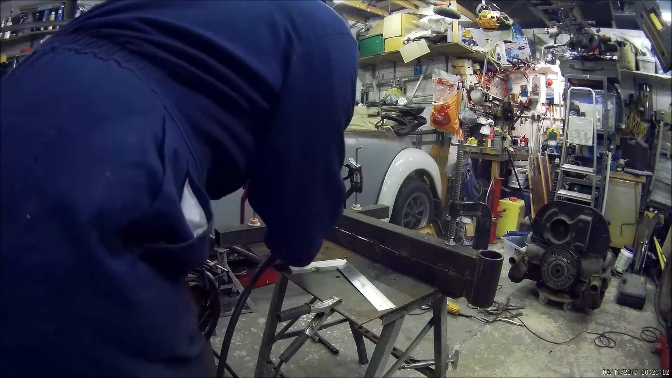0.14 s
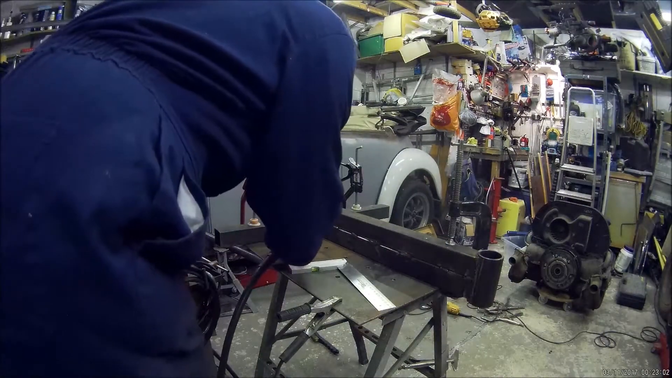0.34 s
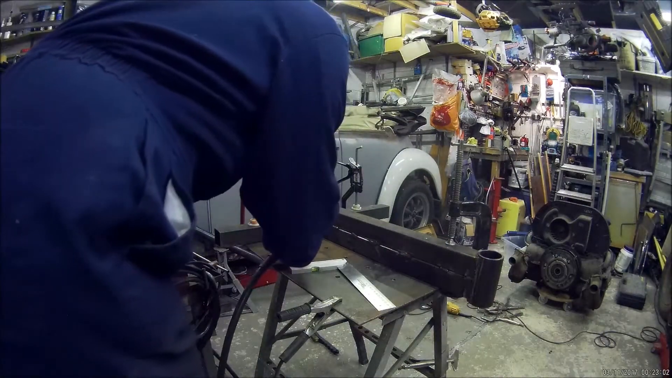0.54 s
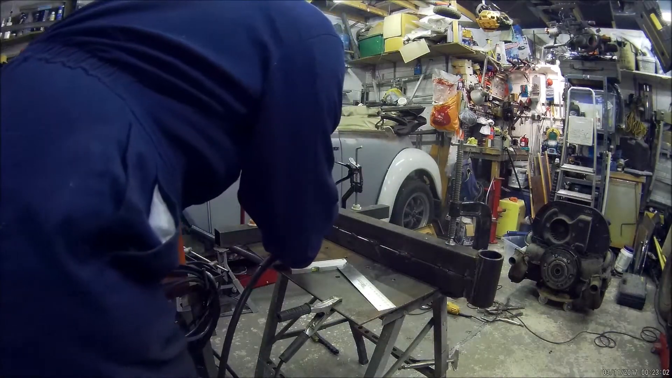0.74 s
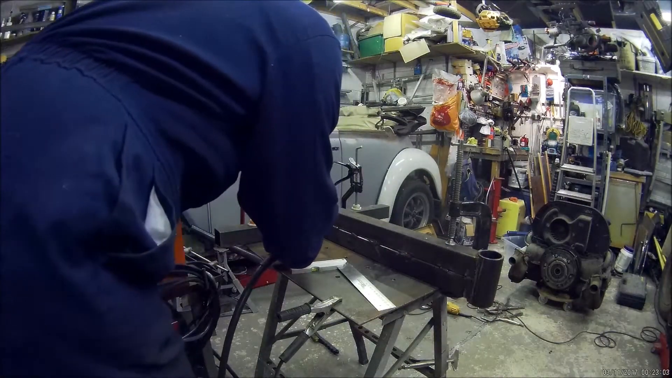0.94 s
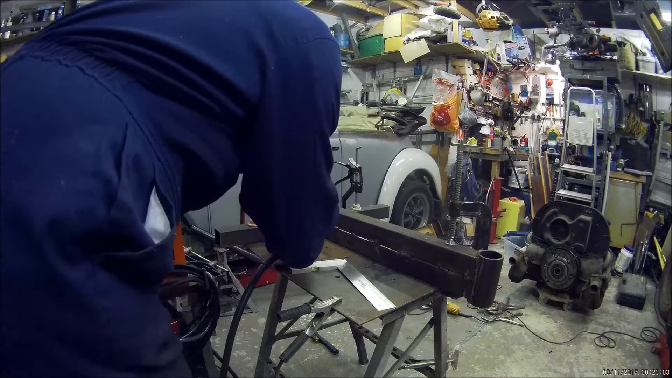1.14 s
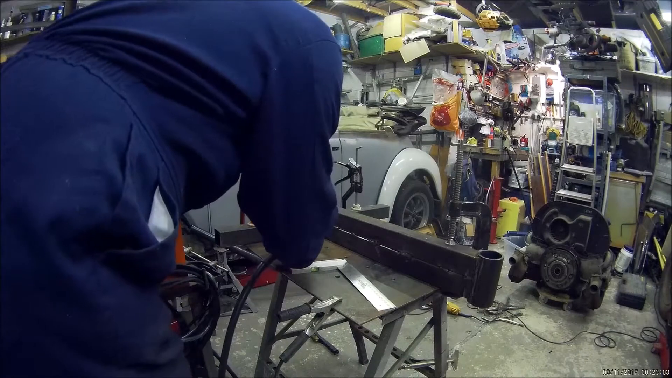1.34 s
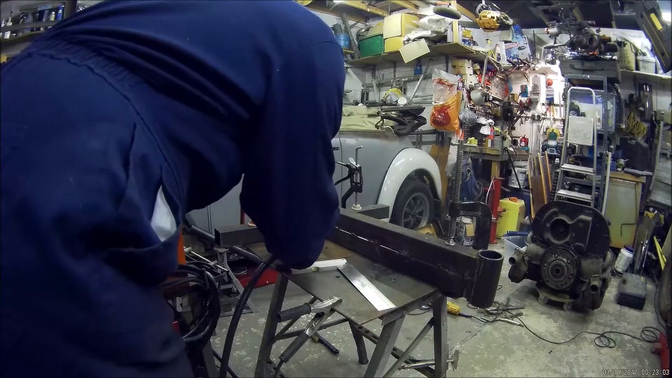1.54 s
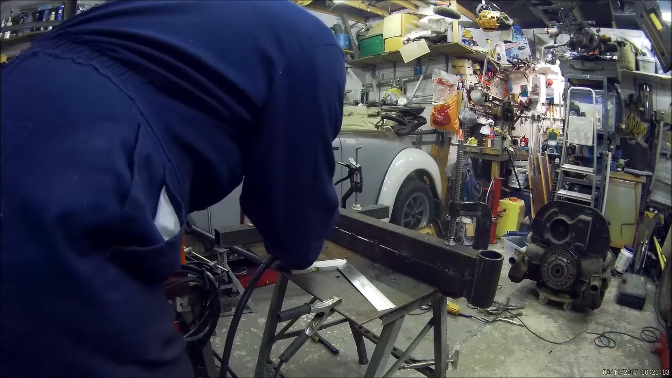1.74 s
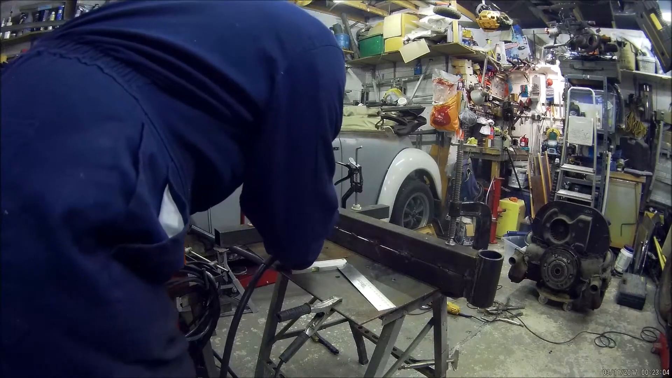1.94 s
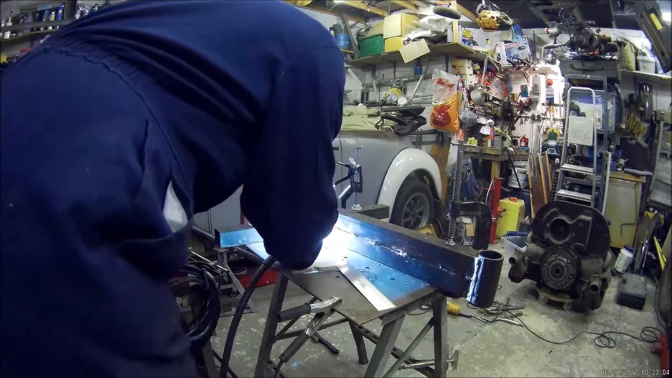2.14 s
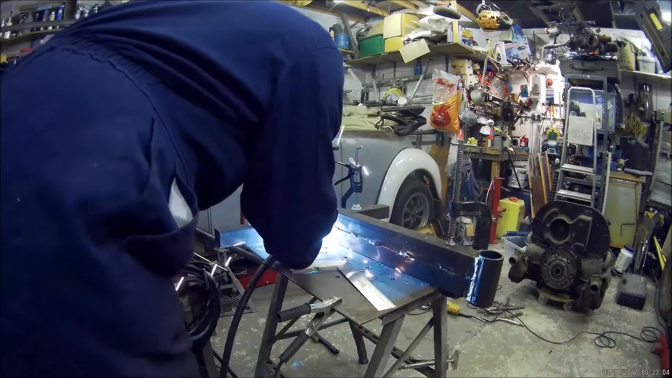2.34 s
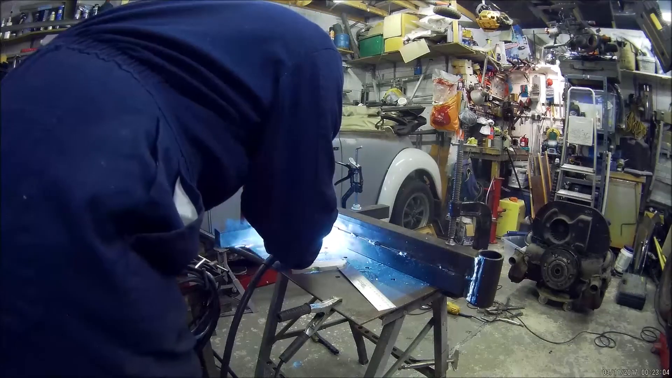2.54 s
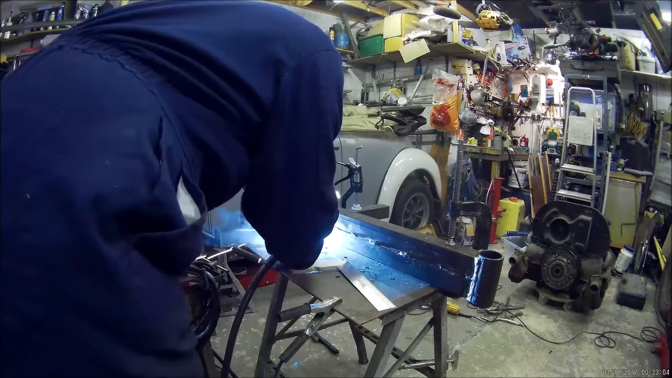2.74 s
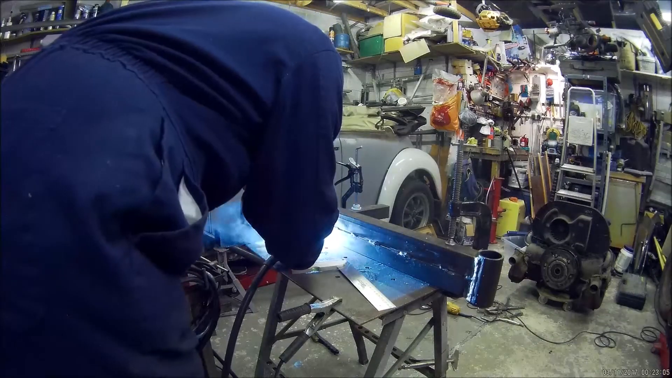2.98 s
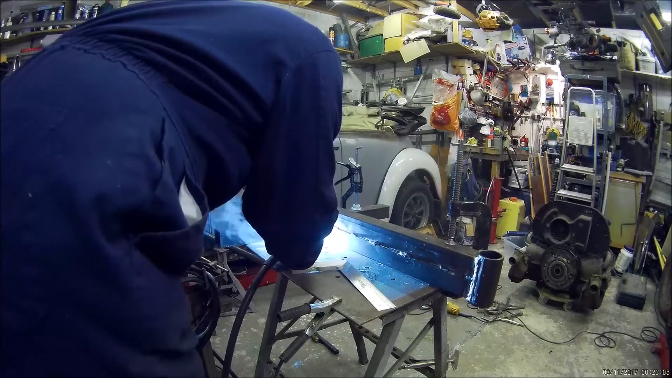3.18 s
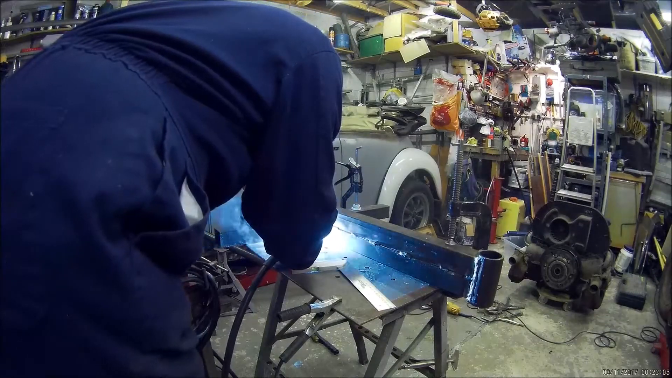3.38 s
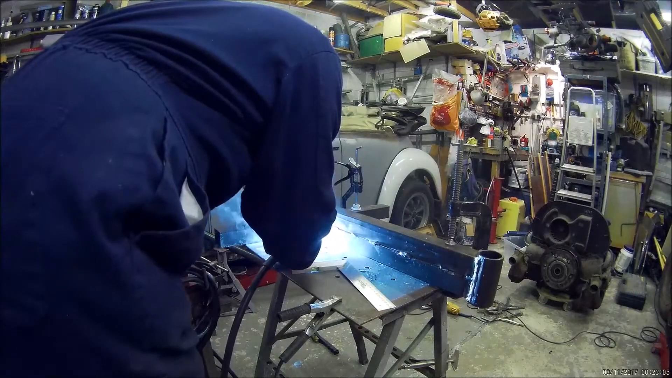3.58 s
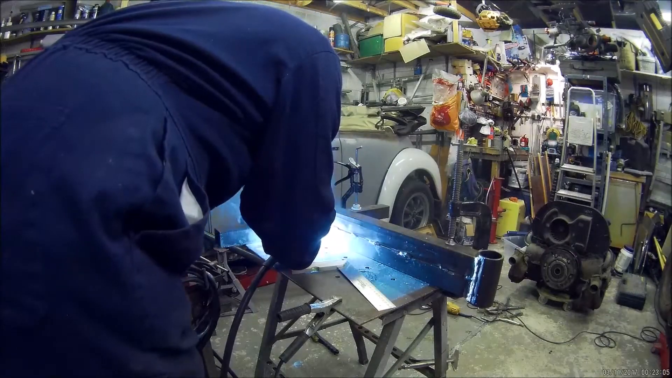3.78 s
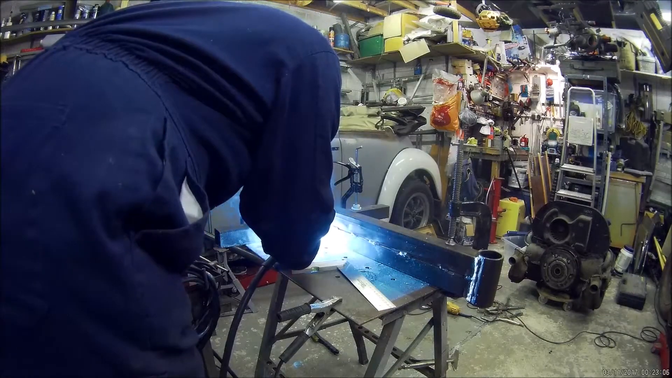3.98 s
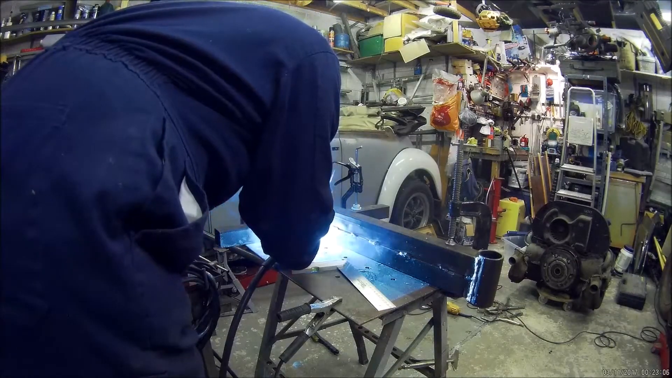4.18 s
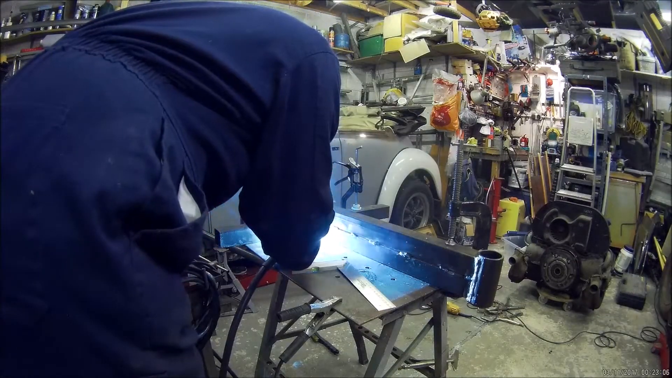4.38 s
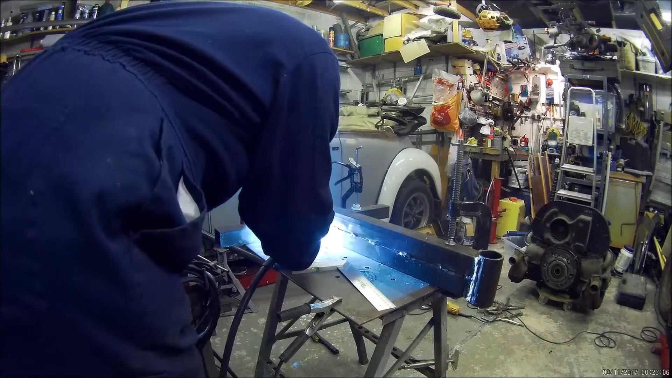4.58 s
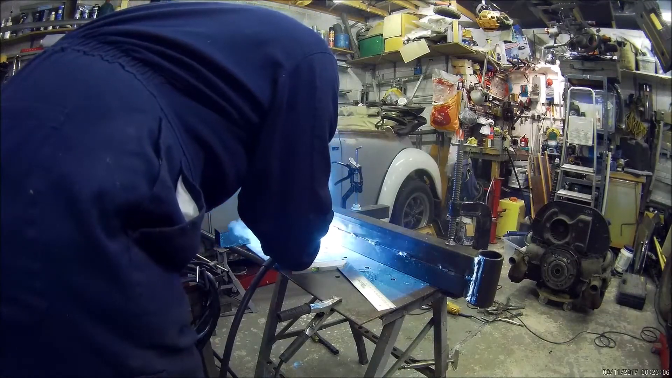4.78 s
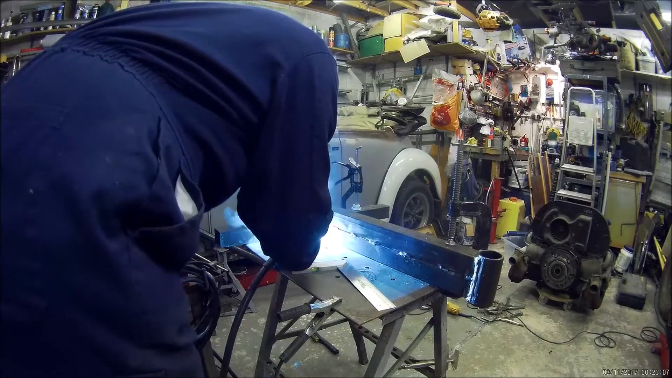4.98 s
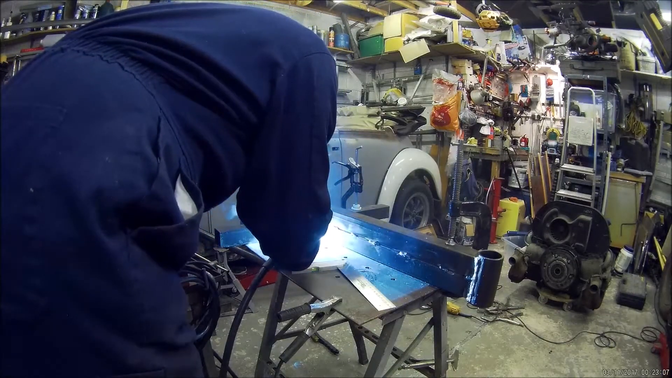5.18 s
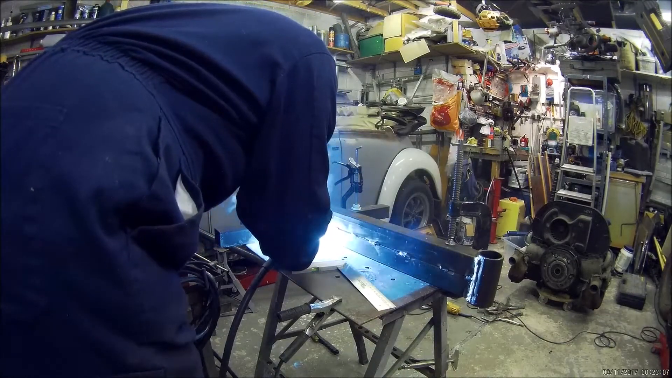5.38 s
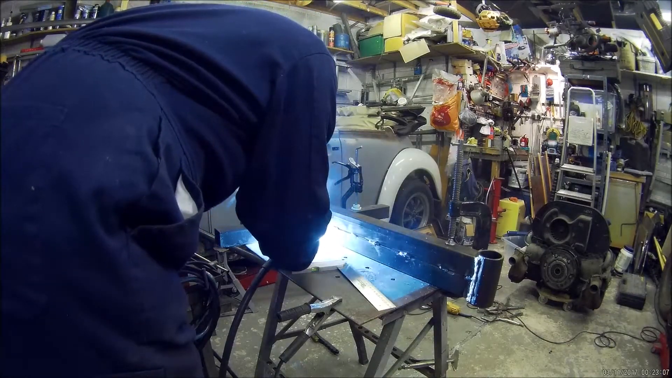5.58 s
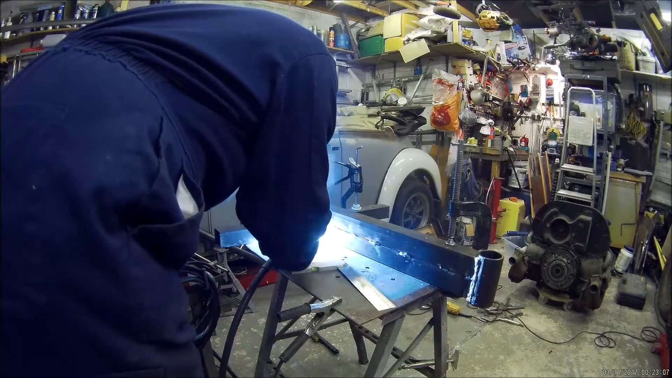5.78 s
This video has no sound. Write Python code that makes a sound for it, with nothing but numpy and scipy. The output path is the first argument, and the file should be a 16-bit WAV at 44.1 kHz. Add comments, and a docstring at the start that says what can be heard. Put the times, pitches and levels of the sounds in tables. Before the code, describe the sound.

For the first 1.7 seconds it is very quiet: a welding machine's low hum and soft fan, cloth rustling mostly in the first 0.4 seconds and briefly near 1.1, barely audible thin squeaks around 0.4 and 1.2, and light taps at 0.1 and, more clearly, 1.5. At 1.7 shielding gas spurts, then settles into a hollow, fluttering hiss, joined by a faint low drone. A small spark ticks at 2.06 and the arc catches at 2.08 with tiny whistles and a violent cluster of pops. From there to the end near 6 seconds it fries continuously, rough with mains pulsing, under sharp, uneven snaps often repeating a hundredth of a second apart. Droplets sputter after them; short dull rasps appear, strongest near 2.4, 3.0 and 4.4. The close microphone flattens and thumps on the hardest pops, amid brief bench reflections, faint steel ringing and a short garage tail.

```python
"""Arc welding on a steel beam in a cluttered garage, with a small microphone close by.
The welder's hum tones and fan noise run throughout, under shaped-noise cloth rustle, light taps and squeaks.
The torch then hisses with filtered noise and a narrow drone joins; a spark and brief whistles mark the strike.
The arc fries as dense ticks and noise in step with the rectified mains, and pops as short shaped pulses.
Pops bounce off bench and beam, ring in the room and overload the microphone; short dull rasps lie among them."""
import sys
import numpy as np
from scipy import signal
from scipy.fft import rfft, irfft, next_fast_len
from scipy.io import wavfile
from scipy.ndimage import uniform_filter1d

SR = 44100
rng = np.random.default_rng(int(sys.argv[2]) if len(sys.argv) > 2 else 0)


def materialize(psi):
    """Save the field psi as 16-bit PCM at rate SR to the path in sys.argv[1].

    A 1-D psi becomes a single channel; in a 2-D psi each row is a channel.
    """
    bounded = np.clip(np.atleast_2d(psi).T, -1, 1)
    quanta = np.round(bounded * 32767).astype(np.int16)
    wavfile.write(sys.argv[1], SR, quanta)


N = 256662

# hum tones of the idling welder: (frequency [Hz], rms level [dB])
HUM_TONES = [(199.2, -68), (236.9, -72), (355.3, -75), (602.9, -70), (699.8, -80), (904.4, -84)]
# colour of the welder's fan: (frequency [Hz], relative density [dB per Hz])
FAN_COLOUR = [(15, -31), (25, -10), (86, -15), (202, -6.5), (309, -13.5), (354, -7.5), (475, -16.5),
              (604, -11), (749, -19), (978, -15), (1120, -26), (1460, -20.5), (5010, -48), (15000, -43)]
# hard surfaces near the arc: (delay [ms], gain [signed ratio])
BENCH_ECHOES = [(1.587, .14), (3.039, -.28), (3.696, -.18), (4.376, -.14), (4.943, -.25), (5.442, -.22),
                (10.02, -.07), (11.47, .09)]
# overalls and cable shifting: (time [s], length [s], level [dB])
CLOTH_SHIFTS = [(-.25, 0.62, -64), (1.087, 0.14, -69)]
# colour of the rustling cloth: (frequency [Hz], relative density [dB per Hz])
CLOTH_COLOUR = [(350, -1.5), (600, -2), (642, -20), (765, -3), (1330, -6), (2300, -7.5), (3360, -6.5),
                (4700, -12.5), (7450, -22.5), (15000, -34)]
# light taps of the torch and its cable: (time [s], level [dB])
TORCH_TAPS = [(0.1, -63), (1.504, -58)]
# colour of a tap: (frequency [Hz], relative density [dB per Hz])
TAP_COLOUR = [(800, -25), (1520, 4), (2000, -3), (2500, 1), (2900, 2), (4000, -8), (6000, -24), (12000, -45)]
# faint squeaks as things shift: (time [s], length [s], starting pitch [Hz], level [dB])
SQUEAK_EVENTS = [(0.328, 0.195, 3080, -80), (1.079, .41, 3240, -76)]
# colour of gas leaving the nozzle: (frequency [Hz], relative density [dB per Hz])
NOZZLE_COLOUR = [(300, -25), (800, -31), (1250, -15), (1650, -13), (2080, -7), (2600, -11.5), (3200, -12),
                 (3700, -16.5), (4400, -14), (5200, -25), (7000, -19.5), (8300, -35), (9900, -40),
                 (11200, -25), (12500, -49), (15500, -40)]
# the wire shorts into the pool and bursts, often again on the next half waves:
# (time [s], peak level [dB], dullness shelf [dB], sharpness shelf [dB])
POP_EVENTS = [(2.0867, -4.5, -5, 5), (2.0982, 1.5, 11, 8), (2.174, 11, -2, 9), (2.1926, 0, -3, 12),
              (2.1933, 3, 5, 1), (2.195, 1.5, 0, 11), (2.2642, 2, 8.5, 16), (2.2736, -4, 7.5, 0),
              (2.2857, -15, -2, -3), (2.2868, -12, 0, -8), (2.302, -2.5, 1, 4), (2.3714, 3, 2, 3),
              (2.3807, -3, -1, 1), (2.3918, -1.5, 6, 9.5), (2.3946, -8, 3, 6), (2.3957, -1, 2, 10),
              (2.4044, -9, 7, 1.0), (2.4133, -8, 1, -18), (2.4731, 0.5, 5.5, 14), (2.4855, -1, 4, 11),
              (2.4945, -3, 3, 13.5), (2.5044, -4, -5.5, 2), (2.513, -3, -2, -2.0), (2.5639, 1.5, 1.5, 7),
              (2.5741, -6, 1, -5), (2.5839, -8.5, -1, -5.5), (2.6031, -5.5, 7, -2), (2.6117, -9, -2, -6),
              (2.6444, -0.5, -2.0, 5), (2.6534, -11, 6, 3), (2.6653, -3, 4.0, 4), (2.6841, -0.5, 0, 5),
              (2.6933, -3, -1, 10), (2.7035, -5, 4.5, 3), (2.7622, 4.5, -7.5, 6.5), (2.8222, 4, -8, 6.5),
              (2.9533, 4.5, -4, 9.5), (2.9724, 0.5, -0.5, 9.5), (2.9824, -12, 0, 5), (2.9832, 2.5, -3, 2),
              (2.9926, -10, -6, -15), (3.0615, 6, -3, 10), (3.102, -2, 3.5, 4), (3.1466, -6, 5.5, 4),
              (3.1512, -14, 3, 0), (3.1613, -3.5, -5, 3), (3.1798, -11.5, 10, 2.5), (3.202, 4.0, 5, 9.5),
              (3.2116, -19, 1.5, 0.0), (3.2333, 7, 2, 12), (3.2447, -23, -10, -5.5), (3.2616, -2.5, 0, -1),
              (3.274, -12.5, -6, -15), (3.3231, -2.5, 3, 11), (3.3603, -9, -1, 3), (3.3721, -4, 2, 7),
              (3.383, 4.5, -5, 6), (3.3935, -4.5, 1, 4), (3.4112, -8.5, 6, 4), (3.4428, 0, 4, 6),
              (3.4518, -2, -3, 5), (3.4632, -5, 11, 7), (3.4726, -3, -0.5, 8), (3.4825, -6, 1, -2),
              (3.54, -9, 0, -2), (3.5728, -1, -1.5, 9.5), (3.6014, -0.5, -4.5, 3.5), (3.613, -18.0, 3, 2.0),
              (3.6348, -17, 1, -3.5), (3.6523, 3.5, -10, 3), (3.6625, -1, 8, 7), (3.7109, 0, -0.5, 9.5),
              (3.7203, -4.5, 4.5, 3), (3.7625, 9.5, -4, 10), (3.8126, 2, 1, 8.5), (3.8222, -3, -2, 5),
              (3.8403, -10, -3, -10), (3.8926, 6.5, -3, 6.5), (3.9029, 1, -1.5, 9), (3.911, -3, 1, 8),
              (3.9225, -10, 1, -2.5), (3.944, -7.5, 3, -5), (3.959, -14, -9, -3), (3.9726, 3.5, -7, 8.5),
              (3.982, -3.5, 1, 7), (3.9927, -6, 5, 2.0), (4.0018, -8, -1, 5), (4.0109, -12, -7, 0),
              (4.0419, -7, 8.5, 5), (4.0608, -10, 7, 2), (4.0938, -1.5, 0.5, 4), (4.1000, -9.5, 0, 2),
              (4.1116, -6.5, 10, 15), (4.1202, -10, 5, -2), (4.1520, -10, -2, 5), (4.1546, -3.5, 0, -3),
              (4.1610, -7.5, 0, -2), (4.1917, 0.5, -3.5, 7.5), (4.204, -21, 1, 0.0), (4.2304, -9, -1, 0),
              (4.2432, -16, 1, -9.0), (4.2615, 6, -4, 0), (4.271, 1, 1, 14), (4.282, -2, 10, 13),
              (4.2923, -3, 4, -5), (4.351, 0.5, -0.5, 9.5), (4.3602, -8, 4, -2), (4.3724, 0.5, -1.5, -4),
              (4.392, 0, -1, 3), (4.4319, -0.5, -2, 9.5), (4.4415, -3, 8, 10), (4.5014, 7, -11, 4.5),
              (4.5121, -6, 6, 8), (4.5212, -9, 5, 2.0), (4.5325, -4.5, -3, 4.0), (4.5421, -7.5, -1, -2.5),
              (4.6, 0, -6.5, 6.5), (4.6315, -4.5, -1, 1), (4.663, -0.5, 0.5, 9.5), (4.6703, -10, 6.5, 1.0),
              (4.6801, -4, 0.5, -5), (4.6919, 2.5, -6, 7), (4.7016, -3.5, 0.5, -2), (4.7207, -7.5, -1, -18),
              (4.731, -7.5, -7, -15), (4.8317, 6.5, -4, 7.5), (4.8416, -2, 9, 8), (4.8515, -7.5, 0.0, -24),
              (4.903, -18, 4, -5), (4.9223, 1.5, -0.5, -5), (4.9415, -1, -2.5, 10), (4.95, -11, -5, 4),
              (4.9615, -3.5, 4, 2), (4.971, -4.5, -2.5, 5.5), (5.0225, -18, 2.0, -2.5),
              (5.0435, -18, 4, -5), (5.0615, 7.5, -2, 10), (5.0721, -10.5, 4, -6), (5.082, -8, 3, 1),
              (5.1393, -1, 0, 8), (5.1514, -0.5, 6.5, 6), (5.181, -4.5, 6, -3), (5.213, -2, 3, 6),
              (5.2308, -0.5, 2, 3), (5.2622, 1, -5.5, 7), (5.271, -3, 3, -9), (5.301, -20, -4, -1.5),
              (5.3714, 9.5, -4.5, 6), (5.4297, 0.5, -0.5, 9), (5.4515, -17, 7, -9), (5.4726, -16, 5, -12),
              (5.4911, -12, -5.0, 1), (5.5126, -15, 7, -2.5), (5.5328, -8.5, 3, 12), (5.5444, 0.5, 5.5, 8),
              (5.5731, -3.5, 12, -2), (5.5737, -4, -7, 3), (5.5921, -14.5, 14, -1), (5.5923, 4, -4.5, 9),
              (5.6318, 5, -1.5, 14), (5.6743, -13.5, -8, 2), (5.7111, 3, 3.5, 8), (5.7309, 8.0, -3, 9.5)]
# spectrum of a burst's pressure pulse: (frequency [Hz], relative level [dB])
SNAP_SPECTRUM = [(30, -16), (300, -18.5), (550, -8), (820, -3.5), (1200, 1.5), (1900, 2), (2450, -1.5),
                 (3200, 4), (4500, 2), (5600, -7.5), (7800, -16.5), (11500, -13), (13500, -30),
                 (16000, -36.5)]
# ringing modes of the beam and bench: (frequency [Hz], relative level [dB], 60 dB decay [s])
STEEL_MODES = [(1187, -6, .15), (1272, -5, .15), (1480, -4, .15), (1724, -2, .14), (1948, -2, .15),
               (2860, -4, .13), (3145, -1, .1), (3360, -3, .1), (3757, -2, .1), (3940, -3, .15),
               (4151, -2, .15), (4543, 1, .15), (4741, -2, .15), (6062, -8, .15)]
# decay of the room: (frequency [Hz], 60 dB decay [s])
GARAGE_DECAY = [(150, 0.22), (1000, 0.43), (4000, 0.38), (12000, 0.19)]
# colour of the room's answer: (frequency [Hz], relative level [dB])
WALL_COLOUR = [(100, -3), (500, 12.5), (1500, 2), (4000, 0.5), (5800, 10.5), (7500, 8), (12000, 4)]
# the arc whistles briefly as it catches: (time [s], length [s], pitch [Hz], level [dB])
WHISTLE_EVENTS = [(2.071, 0.02, 1270, -41), (2.113, 0.062, 1075, -32.5), (2.143, .03, 2160, -40)]
# colour of the frying arc: (frequency [Hz], relative density [dB per Hz])
FRY_COLOUR = [(30, -14), (100, -20), (190, -28), (340, -16), (500, -19), (680, -4), (810, 4.5), (1000, -2),
              (1250, 0.5), (1650, 9), (1900, 4.5), (2400, -6), (2820, 4), (3000, -8), (3400, 5),
              (4550, -7.5), (5500, -1), (6050, -3.5), (6800, -14), (9000, -13.5), (11800, -11),
              (15000, -13)]
# colour of the boiling pool: (frequency [Hz], relative density [dB per Hz])
FIZZ_COLOUR = [(2500, -40), (5500, 0), (7500, -4), (11800, 0), (15000, -6)]
# short dull rasps: (time [s], level [dB])
RASP_EVENTS = [(2.104, -35), (2.128, -39), (2.409, -26), (2.986, -23), (3.267, -29.5), (4.377, -25.5),
               (4.719, -36), (4.845, -31), (5.165, -27), (5.273, -32), (5.587, -37)]
# colour of a rasp: (frequency [Hz], relative density [dB per Hz])
RASP_COLOUR = [(250, -43), (700, -2.0), (1600, -3.5), (2300, -9.5), (3600, 2.0), (4800, -6.0),
               (7000, -20), (12000, -60)]
# treble response of the microphone: (frequency [Hz], gain [dB])
MIC_TREBLE = [(12500, 0), (13500, -3), (15900, -3), (16200, -22), (16800, -32)]

STIR_DB = -73.5  # the cloth is never quite still
SQUEAK_RISE = 0.078  # the pitch climbs by this share in mid-movement
VALVE_S, VALVE_OPEN_S, GAS_DB = 1.68, 0.043, -46  # shielding gas: valve time, opening time, steady hiss
SPURT_DB, SPURT_S = 5, 0.054  # pressure stored in the hose escapes first: boost, decay time
JET_HZ, JET_WIDTH_HZ, JET_DB = 2030, 130, -54.5  # the gas excites a resonance of the nozzle
# a low drone under the arc, likely the wire feed: start, rise time, first level, growth
FEED_S, FEED_RISE_S, FEED_DB, FEED_GROWS_DB_PER_S = 1.88, 0.24, -61.5, 1.14
SPARK_S, SPARK_DB = 2.0621, -21  # the wire first touches the steel: time, peak
ARC_S, ARC_DB = 2.08, -40.5  # the arc catches and fries from here on: time, reference level
RIPPLE_HZ, CREST_S = 100, .0025  # half waves of the mains; the current peaks this far into each
# small stray pops: chance per half wave, peak, scatter, sharpness
SPIT_CHANCE, SPIT_DB, SPIT_SPREAD_DB, SPIT_SHARP_DB = 0.22, -21.5, 1.5, 4.5
WHISTLE_SAG_PER_S = 0.31  # share of its pitch lost in a second
SPATTER_DB, SPATTER_S = -28, .006  # droplet ticks: base level against the pop, mean delay
TOP_HZ = 16800  # nothing passes the microphone above this


def amp(db):
    """Decibels to gain."""
    return 10 ** (np.asarray(db) / 20)


def unit(x):
    """Scale to rms 1."""
    return x / np.sqrt(np.mean(x ** 2) + 1e-20)


def along(points, hz):
    """Read (Hz, value) points on a log frequency axis."""
    f, v = np.transpose(points)
    return np.interp(np.log(hz + 1), np.log(f + 1), v)


def filtered(x, response):
    """Apply a response of frequency to x."""
    m = next_fast_len(N + SR // 2)
    return irfft(rfft(x, m) * response(np.fft.rfftfreq(m, 1 / SR)), m)[:N]


def noise(spectrum):
    """Coloured noise of rms 1."""
    return unit(filtered(rng.standard_normal(N), lambda hz: amp(along(spectrum, hz))))


def resonant_noise(centre_hz, width_hz):
    """Noise of rms 1 through a narrow resonance."""
    return unit(filtered(rng.standard_normal(N), lambda hz: 1 / (1 + ((hz - centre_hz) / width_hz) ** 2)))


def pulse(colour_db, size=1024):
    """The causal pulse of peak 1 that has a given spectrum."""
    # folding the cepstrum forward gives the minimum-phase pulse
    cepstrum = irfft(np.log(amp(colour_db(np.fft.rfftfreq(size, 1 / SR)))))
    cepstrum[1:size // 2] *= 2
    cepstrum[size // 2 + 1:] = 0
    p = irfft(np.exp(rfft(cepstrum)))
    return p / np.abs(p).max()


def add(track, s, sound):
    """Mix a sound into a track at time s."""
    part = track[max(round(s * SR), 0):][:len(sound)]
    part += sound[:len(part)]


def since(s):
    """Seconds elapsed since time s, zero before it."""
    return np.maximum(np.arange(N) / SR - s, 0)


def onset(s, attack):
    """A gain that rises from 0 to 1 and holds."""
    return np.clip(since(s) / attack, 0, 1)


def arch(s, length):
    """A gain that swells to 1 and falls back."""
    return np.sin(np.pi * onset(s, length))


def waver(size=100):
    """Smooth random motion of rms 1, alike over about size samples."""
    return unit(uniform_filter1d(rng.standard_normal(N), size=size))


def glide(pitch):
    """A sine of rms 1 that follows a moving pitch in Hz."""
    return np.sqrt(2) * np.sin(2 * np.pi * np.cumsum(pitch) / SR)


def welder(fan_db=-64.5, hum_db=0):
    """The power source hums in steady tones and its fan runs throughout."""
    t = np.arange(N) / SR
    hum = np.zeros(N)
    for hz, db in HUM_TONES:
        hum += amp(db + hum_db) * np.sqrt(2) * np.sin(2 * np.pi * (hz * t + rng.random()))
    return hum + amp(fan_db) * noise(FAN_COLOUR)


def bench(x, shadow_hz=2000, scatter_hz=8000, echo_db=0):
    """Small hard surfaces near the arc throw back the middle band: the bass passes them, the top scatters."""
    def response(hz):
        copies = sum(gain * np.exp(-2j * np.pi * hz * ms / 1000) for ms, gain in BENCH_ECHOES)
        band = hz ** 2 / (hz ** 2 + shadow_hz ** 2) / (1 + (hz / scatter_hz) ** 4)
        return 1 + amp(echo_db) * copies * band
    return filtered(x, response)


def handling(tap_t60=.035, tail_db=-9, tail_t60=.2):
    """Stiff cloth rustles unevenly; the torch is set against the work with light taps."""
    grain = amp(1.6 * waver(size=200))
    motion = amp(STIR_DB) + sum(amp(db) * arch(s, length) for s, length, db in CLOTH_SHIFTS)
    rustle = motion * unit(bench(grain * noise(CLOTH_COLOUR)))
    taps, t = np.zeros(N), np.arange(SR // 4) / SR
    for s, db in TORCH_TAPS:
        contact = amp(db - 60 * t / tap_t60)
        tail = amp(db + tail_db - 60 * t / tail_t60)
        add(taps, s, contact + tail)
    return rustle + taps * noise(TAP_COLOUR)


def squeaks(waver_hz=210):
    """Thin, fuzzy tones that rise and fall with the speed of a movement."""
    out = np.zeros(N)
    for s, length, hz, db in SQUEAK_EVENTS:
        speed = arch(s, length)
        pitch = hz * (1 + SQUEAK_RISE * speed) + waver_hz * waver(size=45)
        level = amp(db + 2 * waver(size=600)) * np.sqrt(np.abs(speed))
        out += level * glide(pitch)
    return out


def gas(flutter_db=0.7):
    """Shielding gas spurts from the nozzle as the valve opens, then settles to a fluttering, hollow hiss."""
    spurt_db = SPURT_DB * np.exp(-since(VALVE_S + VALVE_OPEN_S) / SPURT_S)
    hiss = amp(GAS_DB) * unit(bench(noise(NOZZLE_COLOUR)))
    hollow = amp(JET_DB) * resonant_noise(JET_HZ, JET_WIDTH_HZ)
    pressure = amp(spurt_db + flutter_db * waver(size=300))
    return onset(VALVE_S, VALVE_OPEN_S) * pressure * (hiss + hollow)


def wire_feed(centre_hz=345, width_hz=30):
    """A rough, narrow drone that grows along the weld."""
    level = amp(FEED_DB + FEED_GROWS_DB_PER_S * since(FEED_S))
    return onset(FEED_S, FEED_RISE_S) * level * resonant_noise(centre_hz, width_hz)


def bursts():
    """List the first spark, the pops, and stray spits at crests of the current, in the columns of POP_EVENTS."""
    crests = np.arange(np.ceil(ARC_S * RIPPLE_HZ), N / SR * RIPPLE_HZ) / RIPPLE_HZ + CREST_S
    spits = []
    for s in crests:
        if rng.random() < SPIT_CHANCE:
            spits.append((s, SPIT_DB + SPIT_SPREAD_DB * rng.standard_normal(), 0, SPIT_SHARP_DB))
    return [(SPARK_S, SPARK_DB, 0, 0)] + list(POP_EVENTS) + spits


def pops(gain_db=0, turn_hz=2400, sharp_hz=6500, splinter_db=-16, touch_db=-22, vary_db=2.0, count=2):
    """Each bridge of metal bursts in one pulse, with a few splinters just after; wide bursts sound duller."""
    out = np.zeros(N)
    for s, db, dull_db, sharp_db in bursts():
        own_colour = np.c_[np.geomspace(300, 16000, num=14), vary_db * rng.standard_normal(14)]

        def colour(hz):
            bass = 1 / (1 + (hz / turn_hz) ** 4)
            treble = hz ** 4 / (hz ** 4 + sharp_hz ** 4) / (1 + (hz / 13200) ** 16)
            return along(SNAP_SPECTRUM, hz) + along(own_colour, hz) + dull_db * bass + sharp_db * treble

        snap = amp(db + gain_db) * pulse(colour)
        add(out, s, -snap)
        for lag in rng.uniform(.0003, .0025, size=count):
            add(out, s + lag, amp(splinter_db) * rng.standard_normal() * snap)
        # the drop touches the pool with a small tick just before it bursts
        lead = rng.uniform(.0004, .003)
        add(out, s - lead, amp(touch_db + 2 * rng.standard_normal()) * snap)
    return out


def seam_share(k, count):
    """How near the torch is to the k-th of count places along the seam."""
    place = (count - 1) * onset(ARC_S, N / SR - ARC_S)
    return np.sqrt(np.clip(1 - np.abs(place - k), 0, 1))


def beam(x, ring_db=-24.5, count=3):
    """The steel rings faintly under the arc; each mode answers differently as the torch moves along it."""
    t, out = np.arange(SR // 2) / SR, np.zeros(N)
    for k in range(count):
        ring = np.zeros(len(t))
        for hz, db, t60 in STEEL_MODES:
            scatter_db, turn = rng.standard_normal(2)
            ring += amp(db + scatter_db - 60 * t / t60) * np.sin(2 * np.pi * (hz * t + turn))
        out += signal.fftconvolve(x * seam_share(k, count), ring / np.linalg.norm(ring))[:N]
    return amp(ring_db) * out


def garage(x, wet_db=-16.5, count=5):
    """A short diffuse tail from shelves and walls; it shifts as the torch travels along the seam."""
    out = np.zeros(N)
    for k in range(count):
        # noise that builds over some 5 ms, then decays at its own rate in each band
        hz, t, z = signal.stft(rng.standard_normal(SR // 2), SR, nperseg=256)
        build = 1 - np.exp(-t / .005)
        decay = amp(along(WALL_COLOUR, hz)[:, None] - 60 * t / along(GARAGE_DECAY, hz)[:, None])
        tail = signal.istft(z * build * decay, SR, nperseg=256)[1]
        out += signal.fftconvolve(x * seam_share(k, count), tail / np.linalg.norm(tail))[:N]
    return amp(wet_db) * out


def whistle(waver_hz=30):
    """Short, slightly unsteady falling tones as the arc catches."""
    out = np.zeros(N)
    for s, length, hz, db in WHISTLE_EVENTS:
        pitch = hz * (1 - WHISTLE_SAG_PER_S * since(s)) + waver_hz * waver()
        out += amp(db) * arch(s, length) * glide(pitch)
    return out


def snap_at(hits):
    """Turn each impulse of a track into a small snap of the common burst spectrum."""
    return signal.fftconvolve(hits, -pulse(lambda hz: along(SNAP_SPECTRUM, hz)))[:N]


def frying(ticks_db=-4.0, hiss_db=-2, ripple=0.3, surge_db=1.0, fizz_db=-17, fizz_surge_db=3):
    """The arc: dense tiny ticks on a hiss, swelling with each half wave; the pool's fizz surges and fades."""
    per_second, spread_db = 1500, 5
    current = 1 + np.clip(ripple, 0, 1) * np.cos(2 * np.pi * RIPPLE_HZ * (np.arange(N) / SR - CREST_S))
    sizes = amp(spread_db * np.minimum(rng.exponential(size=N), 4))
    hits = (rng.random(N) < current * per_second / SR) * sizes
    ticks = unit(snap_at(hits - hits.mean()))
    hiss = current * noise(FRY_COLOUR)
    surge = waver(size=2000)
    body = amp(surge_db * surge) * (amp(ticks_db) * ticks + amp(hiss_db) * hiss)
    fizz = amp(fizz_db + fizz_surge_db * surge) * current * noise(FIZZ_COLOUR)
    return onset(ARC_S, 1 / RIPPLE_HZ) * amp(ARC_DB) * (body + fizz)


def spatter(spread_db=4.0, count=5):
    """Droplets thrown by each pop tick after it at random, fraying its tail."""
    hits = np.zeros(N)
    for s, db, _, _ in POP_EVENTS:
        delays, sizes = rng.exponential(size=(2, count))
        for lag, size in zip(delays, np.minimum(sizes, 3)):
            add(hits, s + SPATTER_S * lag, amp([min(db, 0) + SPATTER_DB + spread_db * size]))
    return snap_at(hits)


def rasps(gain_db=0, life=0.025):
    """Short dull bursts of noise with a fast swell and a rounded end."""
    swell, u = np.zeros(N), np.arange(SR // 10) / SR / life
    for s, db in RASP_EVENTS:
        add(swell, s, amp(db + gain_db) * np.exp(-u ** 4) * (1 - np.exp(-10 * u)))
    return swell * noise(RASP_COLOUR)


def scene():
    """Power source, handling, gas and arc in the garage, as they reach the microphone."""
    idle = welder() + handling() + squeaks()
    torch = gas() + wire_feed()
    arc = bench(pops() + frying() + spatter())
    welding = arc + beam(arc) + garage(arc) + whistle() + rasps()
    return (idle + torch + welding)[None]


def record(dry, thump_db=-6, thump_hz=300, edge_hz=2800, edge_top=0.22):
    """The microphone flattens the pops; the steepest ones push its bias off with a low thump."""
    top, knee = .43, 4  # ceiling of the output, hardness of the bend
    squashed = dry[0] / (1 + np.abs(dry[0] / top) ** knee) ** (1 / knee)
    edges = filtered(dry[0], lambda hz: hz ** 4 / (hz ** 4 + edge_hz ** 4))
    overload = np.clip(np.abs(edges) - edge_top, 0, top)
    # the bias shift loses its steady part below 25 Hz and its top above thump_hz
    thump = filtered(overload, lambda hz: 1j * hz / (25 + 1j * hz) / (1 + 1j * hz / thump_hz) ** 2)
    heard = squashed + amp(thump_db) * thump
    return filtered(heard, lambda hz: (hz < TOP_HZ) * amp(along(MIC_TREBLE, hz)))[None]


dry = scene()
out = record(dry)
materialize(out)
```